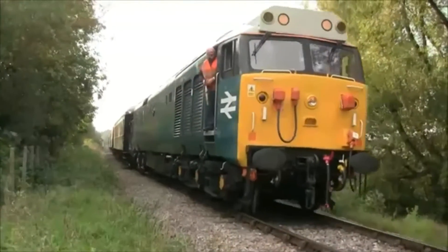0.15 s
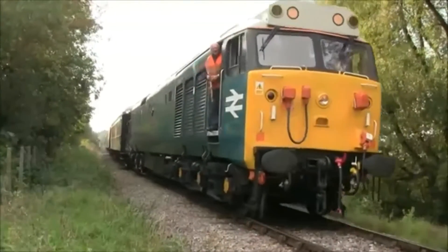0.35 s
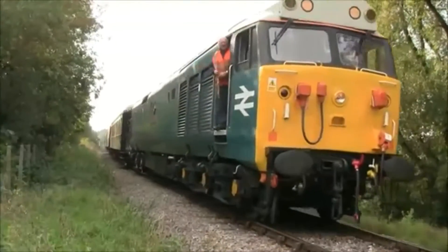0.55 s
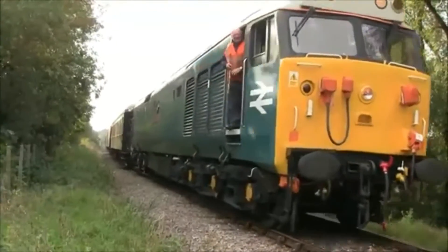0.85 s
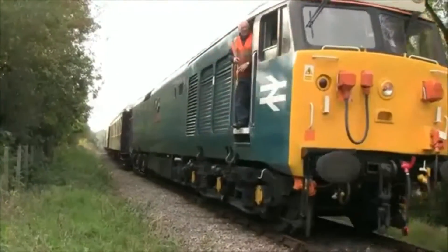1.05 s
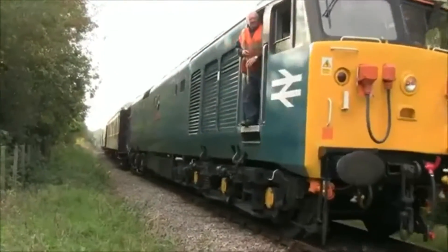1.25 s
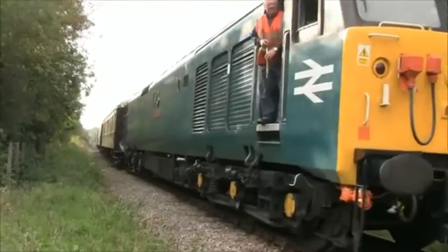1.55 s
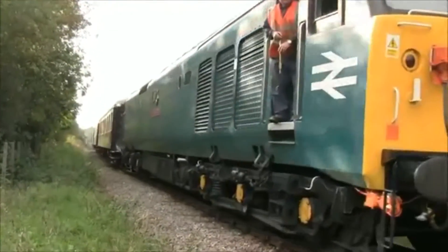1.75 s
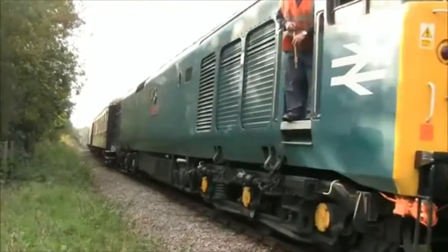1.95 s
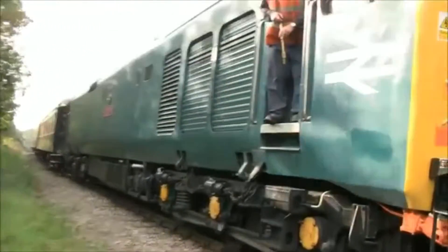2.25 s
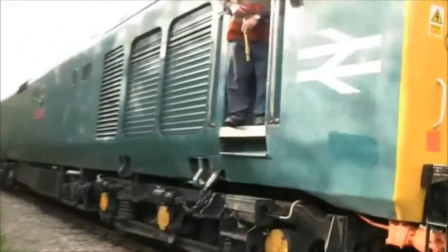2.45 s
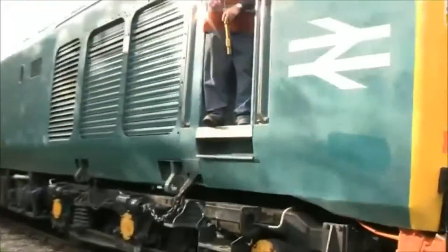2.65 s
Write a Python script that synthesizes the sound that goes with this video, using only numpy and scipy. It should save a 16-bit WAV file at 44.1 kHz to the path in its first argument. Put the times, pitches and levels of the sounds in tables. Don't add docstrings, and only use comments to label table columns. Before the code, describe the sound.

Loud, steady diesel engine roar with a low droning note and rattling valves as a locomotive passes; early on a wheel rubs and squeals thinly, then steel tinks faintly; close outdoor camera microphone with uneven treble.

```python
import sys
import numpy as np
from scipy import signal
from scipy.fft import rfft, irfft, next_fast_len
from scipy.io import wavfile
from scipy.ndimage import uniform_filter1d, map_coordinates

SR = 44100
rng = np.random.default_rng(int(sys.argv[2]) if len(sys.argv) > 2 else 0)


def voltage_ratio(decibels):
    exponent = np.asarray(decibels, float) / 20
    return 10 ** exponent


def inscribe(sig):
    pcm = np.round(np.clip(np.atleast_2d(sig).T, -1, 1) * 32767)
    wavfile.write(sys.argv[1], SR, pcm.astype(np.int16))


N = 123479
T = np.arange(N) / SR
CAM_HZ, FIRINGS_PER_TURN = 5.2, 14

# (time [s], pitch [Hz], level [dB])
ENGINE_NOTE = [(0, 61.5, -24), (.04, 61.5, -21.5), (.24, 62, -22), (.3, 62.5, -34), (.37, 62.5, -21),
               (.58, 62.5, -21), (.66, 62.5, -36), (.74, 62.5, -21), (.94, 63, -22), (.97, 72, -20.5),
               (1.9, 72, -21), (2.09, 73.2, -21.5), (2.17, 74, -31), (2.25, 74.6, -20), (2.44, 74.5, -22.5),
               (2.52, 74.2, -38), (2.6, 73.5, -20), (2.8, 73.3, -22)]
# (time [s], roar level [dB], clatter level [dB], bark level [dB])
PASSING = [(0.0, -13.5, -17, -17), (0.22, -16, -17.5, -18), (0.5, -14.5, -18, -16.5),
           (0.78, -13, -17.5, -16.5), (1.2, -14, -18, -15.5), (1.6, -14, -18.5, -16),
           (2.0, -13.5, -18.5, -15), (2.4, -13.5, -18.5, -15), (2.8, -16, -18, -16.5)]
# (time [s], pitch [Hz], level [dB], half length [s])
HUMS = [(0.296, 160, -20, 0.049), (.62, 115, -18, 0.045), (1.197, 135, -22, .05), (1.366, 160, -19, .05),
        (1.504, 120, -22, .05), (2.72, 270, -21, 0.041), (.15, 180.5, -18, 0.071),
        (.33, 350.4, -14.5, 0.056), (0.815, 175.1, -16, 0.082), (.96, 181, -26, 0.038),
        (0.976, 297.7, -22, 0.068), (1.454, 222, -16.5, 0.054), (1.57, 216, -25, 0.037),
        (1.658, 340, -18.5, 0.1), (1.95, 175.2, -24, 0.04), (2.003, 325, -25, .07), (2.1, 183, -29, 0.061),
        (2.134, 272, -16, 0.08), (2.28, 295, -18, 0.064), (2.35, 185, -27, 0.088),
        (2.433, 285, -14.5, 0.063), (2.454, 225, -16, .06), (2.542, 257.2, -18.5, 0.081),
        (2.615, 218, -24, 0.066), (.1, 812, -23, 0.1), (0.197, 649, -25, .07), (.33, 611, -21.5, .07),
        (1.137, 811, -18.5, 0.17), (1.202, 551, -19, 0.082), (1.8, 815, -17.5, 0.098),
        (1.89, 477, -20.5, 0.053), (2.093, 694, -17, .08), (2.247, 817, -23, .08),
        (2.505, 696, -21.5, 0.12), (2.75, 813, -19, 0.11)]
# (frequency [Hz], level [dB])
ROAR_FRONT = [(20, -50), (29, -14), (40, -1), (60, -1), (98, -2.5), (171, -1), (330, -2), (416, -10),
              (500, -11.5), (650, -43), (1100, -120)]
ROAR_ACROSS = [(50, -19), (110, -23), (180, -30), (260, 4.5), (330, -5), (480, 6.5), (650, -24),
               (1100, -120)]
# (frequency [Hz], level [dB])
BARK_FRONT = [(240, -31), (400, -6.5), (418, -12), (488, -1), (800, 1.5), (998, -11.5), (1150, -15.5),
              (1500, -54), (2530, -120)]
BARK_ACROSS = [(240, -45), (400, -4), (435, -6), (567, 0), (650, -5), (720, -15), (859, -2), (1050, -8),
               (1150, -5), (1500, -40), (2530, -120)]
# (frequency [Hz], level [dB])
CLATTER_FRONT = [(590, -30), (1000, -3.5), (1520, -1), (2300, -6), (3300, -8.5), (4300, -9), (5000, -14),
                 (5900, -24), (6300, -27), (9000, -120)]
CLATTER_ACROSS = [(590, -38), (1000, -13), (1300, -6.5), (2000, -10), (3200, -10), (4500, -11),
                  (5900, -17.5), (6300, -20), (9000, -120)]
# (time [s], pitch [Hz], level [dB])
SQUEAL = [(.07, 5800, -46), (.12, 5760, -35), (.17, 5700, -27), (.21, 5780, -26), (.25, 5910, -22),
          (.28, 6020, -25), (.31, 6080, -36), (.36, 6050, -44), (.42, 6050, -60)]
# (time [s], pitch [Hz], level [dB])
UPPER_SQUEAL = [(.1, 7800, -55), (.22, 8150, -39), (.3, 8400, -37), (.4, 8380, -50), (.47, 8500, -46),
                (.57, 8650, -45), (.62, 8550, -65)]
# (time [s], level [dB])
SCRAPE = [
    (0, -36),
    (.12, -31),
    (.25, -24.5),
    (.42, -28),
    (.6, -43),
    (.8, -70),
]
# (frequency [Hz], level [dB])
SCRAPE_TONE = [(4000, -6.5), (5000, -2.5), (5700, 2), (6200, -24), (7200, -28), (8200, -6.5), (9300, -13.5),
               (11000, -36)]
# (time [s], peak level [dB], time to fade by 60 dB [s])
TINKS = [
    (.632, -32, .03),
    (.640, -33, 0.091),
]
# (frequency [Hz], level [dB])
HISS_FRONT = [(4000, -60), (5900, -30), (6600, 1.5), (7400, -0.5), (8500, -1), (10000, -2), (13000, -10.5),
              (14800, -13.5), (15600, -26), (16500, -120)]
HISS_ACROSS = [(4000, -60), (5900, -6), (6400, 2), (8500, -1), (10000, -4), (13000, -12), (14800, -19),
               (15600, -30), (16500, -120)]
# (frequency [Hz], width [Hz], lift [dB])
PANELS = [(182, 30, 2), (64, 46, -13), (930, 70, 2.5), (1180, 80, 2.5), (1480, 110, 2.5), (2750, 150, 2.5),
          (4180, 120, 3.5)]
# (frequency [Hz], share [0-1], phase turn [rad])
FRONT_ACROSS_LINK = [(400, .15, 2.5), (1000, .2, 0), (2500, .2, 1.8), (4500, .85, 2.2), (6000, .8, 2.15),
                     (6600, .3, 1.4), (8300, .68, 0), (15000, .4, 0)]
# (frequency [Hz], share [ratio])
TREBLE_LIFT = [(4500, 0), (6500, 1), (13500, 1), (15000, 2.2)]
# (frequency [Hz], share [ratio])
SINKING_FRONT = [(5900, 0), (6250, 1.2), (7200, 1), (7900, 0)]
SINKING_ACROSS = [(1050, 0), (1250, 1), (3300, .9), (4100, 0)]
# (frequency [Hz], width [Hz])
SPARED = [(1180, 110), (1470, 90), (1780, 70), (2000, 70), (2400, 130), (2960, 140), (3550, 150)]
# (start [s], end [s], lowest frequency [Hz], highest frequency [Hz])
DROPOUTS = [(.08, .2, 6250, 7500), (.2, .25, 6200, 6850), (.25, .41, 6300, 7450), (.62, .73, 6350, 6950),
            (.79, .88, 6050, 6800), (1.12, 1.34, 6300, 7000), (1.15, 1.2, 6300, 8000),
            (1.58, 1.61, 6300, 6800), (1.66, 1.71, 6350, 7000), (1.75, 1.81, 6300, 6800),
            (2.13, 2.25, 6400, 7000), (2.17, 2.21, 6400, 7700), (2.54, 2.57, 6400, 7000),
            (2.63, 2.78, 6350, 6950)]


def unit(x):
    return x / np.sqrt(np.mean(x ** 2) + 1e-20)


def along(points, hz, col=1):
    columns = np.transpose(points)
    return np.interp(np.log(hz + 1), np.log(columns[0] + 1), columns[col])


def curves(rows):
    s, *columns = np.transpose(rows)
    return [np.interp(T, s, column) for column in columns]


def wobble(rate):
    return map_coordinates(rng.standard_normal(int(N * rate / SR) + 4), [T * rate])


def noise():
    return rng.standard_normal((2, N))


def smooth_patches(shape, across_hz, across_time):
    field = uniform_filter1d(rng.standard_normal(shape), size=across_hz, axis=-2)
    return unit(uniform_filter1d(field, size=across_time, axis=-1))


def heard(x, front, across, across_db, patchy_db):
    z = signal.stft(x, nperseg=512)[2]
    patches = smooth_patches(z.shape[1:], 5, 10)
    x = signal.istft(z * voltage_ratio(patchy_db * patches), nperseg=512)[1][:, :N]
    size = next_fast_len(N + 8192)
    hz = np.fft.rfftfreq(size, 1 / SR)
    a, b = rfft(x, size)
    body = sum(db / (1 + (2 * (hz - centre) / width) ** 2) for centre, width, db in PANELS)
    share = np.clip(along(FRONT_ACROSS_LINK, hz), 0, 1)
    turn = np.exp(1j * along(FRONT_ACROSS_LINK, hz, col=2))
    tied = share * turn * a + np.sqrt(1 - share ** 2) * b
    spectra = [a * voltage_ratio(along(front, hz) + body), tied * voltage_ratio(along(across, hz))]
    mid, side = irfft(spectra, size)[:, :N]
    return np.array([unit(mid), voltage_ratio(across_db) * unit(side)])


def beat(per_turn, sharp, uneven_db):
    turns = per_turn * np.cumsum(CAM_HZ * (1 + .02 * wobble(2.7))) / SR
    pulse = turns.astype(int)
    cylinder = rng.normal(0, 1, per_turn)[pulse % per_turn]
    size = cylinder + 2.35 * rng.normal(0, 1, N)[pulse]
    return unit(voltage_ratio(uneven_db * size) * np.exp(-sharp * (turns % 1)))


def exhaust():
    roar_db, _, bark_db = curves(PASSING)
    gate = beat(FIRINGS_PER_TURN, sharp=0.48, uneven_db=-1.0)
    roar = heard(noise() * (1.0 + 0.24 * gate), ROAR_FRONT, ROAR_ACROSS, across_db=-16.5, patchy_db=0.7)
    bark = heard(noise() * (0.79 + 0.33 * gate), BARK_FRONT, BARK_ACROSS, across_db=-8, patchy_db=1.05)
    roar *= voltage_ratio(roar_db - 0.13 + 0.29 * wobble(7.4))
    bark *= voltage_ratio(bark_db - 0.04 + 0.14 * wobble(7.6))
    return roar + bark


def engine_note():
    hz, db = curves(ENGINE_NOTE)
    phase = 2 * np.pi * np.cumsum(uniform_filter1d(hz, size=400)) / SR
    return voltage_ratio(np.maximum(db, -36) + 2.5) * np.sin(phase) * [[1], [0]]


def hums():
    out = np.zeros(N)
    for s, hz, db, half in HUMS:
        swell = voltage_ratio(db + 0.54 * wobble(21.0)) * np.exp(-((T - s) / half) ** 2)
        phase = 2 * np.pi * np.cumsum(hz * (1 + .003 * wobble(5.93))) / SR
        out += swell * np.sin(phase)
    return out * [[1], [.12]]


def clatter():
    heavy = 0.83 + 0.23 * beat(2, sharp=1.5, uneven_db=1.0)
    dense = 1.12 + 0.21 * beat(16, sharp=2.0, uneven_db=1.5)
    knocks = heard(noise() * heavy * dense, CLATTER_FRONT, CLATTER_ACROSS, across_db=-5, patchy_db=0.8)
    return voltage_ratio(curves(PASSING)[1] - 0.08 + 0.16 * wobble(9.18)) * knocks


def flange_scrape():
    return voltage_ratio(curves(SCRAPE)[0]) * heard(noise(), SCRAPE_TONE, SCRAPE_TONE, across_db=5, patchy_db=-1.0)


def flange_squeal():
    out = np.zeros((2, N))
    for rows, blur_hz, across in ((SQUEAL, 70, [[1.2], [-1.6 + .9j]]), (UPPER_SQUEAL, 140, [[1], [1.5]])):
        hz, db = curves(rows)
        phase = 2 * np.pi * np.cumsum(hz + blur_hz * wobble(300)) / SR
        out += voltage_ratio(db + 2.4 * wobble(74.0)) * np.real(np.array(across) * np.exp(1j * phase))
    return out


def loose_steel():
    out = np.zeros((2, N))
    for s, db, t60 in TINKS:
        t = np.maximum(T - s, 0)
        strength = voltage_ratio(db - 60 * t / t60) * (1 - np.exp(-t / .0007))
        out += strength * np.sin(2 * np.pi * 12600 * t) * [[1], [.6]]
    return out


def hiss():
    level = voltage_ratio(-39.5 + 0.54 * wobble(5.2) + 0.32 * wobble(21))
    return level * heard(noise(), HISS_FRONT, HISS_ACROSS, across_db=5.0, patchy_db=2.1)


def overload(x):
    ceiling, hardness = .99, 8
    return x / (1 + np.abs(x / ceiling) ** hardness) ** (1 / hardness)


def breathing_treble(x):
    every_s, fade_s = .94, .07
    hz, t, z = signal.stft([x[0] + x[1], x[0] - x[1]], SR, nperseg=1024)
    since = (t - .425) % every_s
    half = (since - every_s / 2) % every_s
    puff = 4.8 * np.exp(-since / fade_s) + 1.8 * np.exp(-half / fade_s)
    lift = puff * along(TREBLE_LIFT, hz)[:, None]
    lift += -35 * np.outer(hz > 15000, np.minimum(since, 2 * half) > .045)
    spared = 1 - np.max([np.exp(-(2 * (hz - c) / w) ** 2) for c, w in SPARED], axis=0)
    share = np.array([along(SINKING_FRONT, hz), along(SINKING_ACROSS, hz) * spared])[..., None]
    patches = smooth_patches(z.shape, 3, 16)
    age = np.array([np.minimum(since, half), since])[:, None]
    depth_db = np.reshape([4, 13], (2, 1, 1))
    sink = depth_db * (1 - np.exp(-(age / .2) ** 2)) * np.clip(1 + 1.2 * patches, 0, 2.5)
    gaps = [np.outer((hz > lo) & (hz < hi), (t > a) & (t < b)) for a, b, lo, hi in DROPOUTS]
    lost = np.any(gaps, axis=0)
    gain_db = lift - share * sink + -30 * np.array([lost, 0 * lost])
    mid, side = signal.istft(z * voltage_ratio(gain_db), SR, nperseg=1024)[1][:, :N] / 2
    return np.array([mid + side, mid - side])


def scene():
    engine = exhaust() + engine_note() + hums() + clatter()
    wheel = flange_scrape() + flange_squeal() + loose_steel()
    front, across = engine + wheel + hiss()
    return np.array([front + across, front - across])


def roll_off(x):
    return signal.sosfilt(signal.butter(12, 15570, fs=SR, output="sos"), x)


def record(dry):
    mix = breathing_treble(overload(dry))
    return roll_off(mix)


dry = scene()
out = record(dry)
inscribe(out)
```